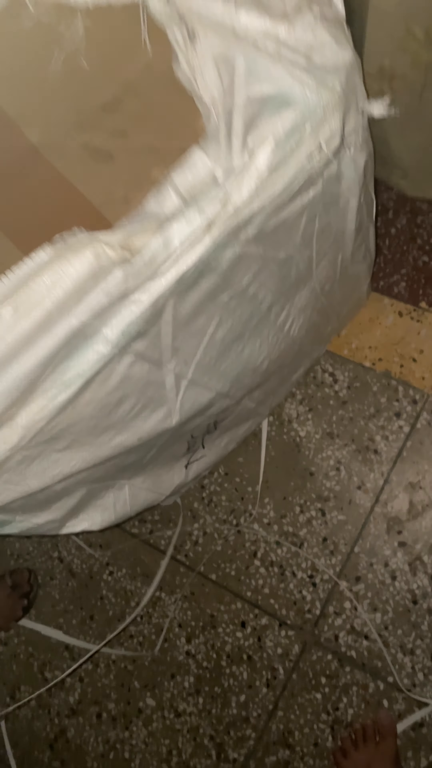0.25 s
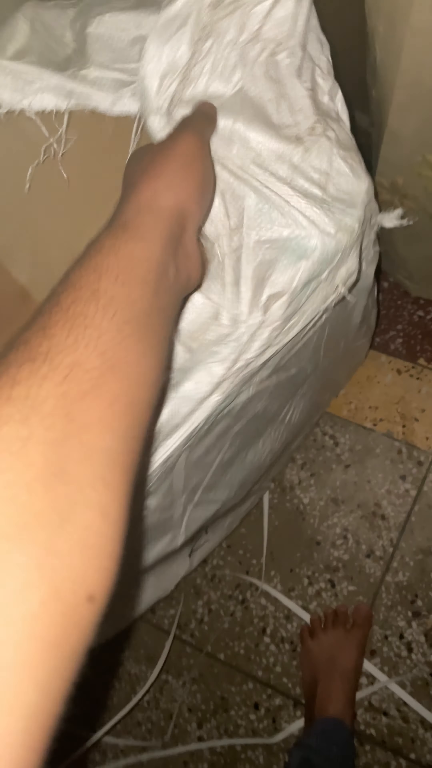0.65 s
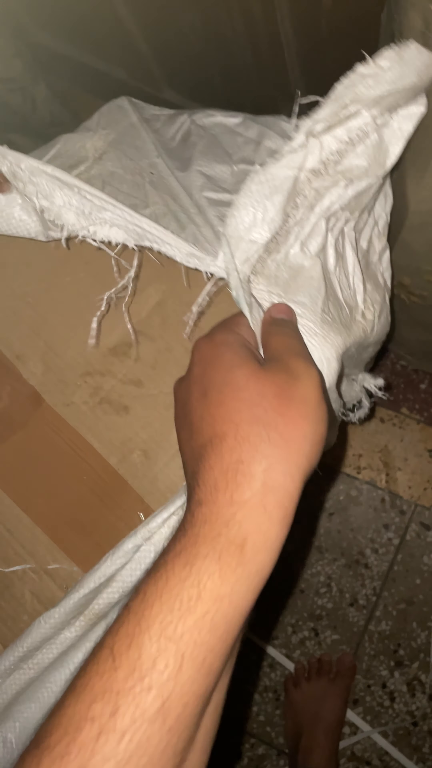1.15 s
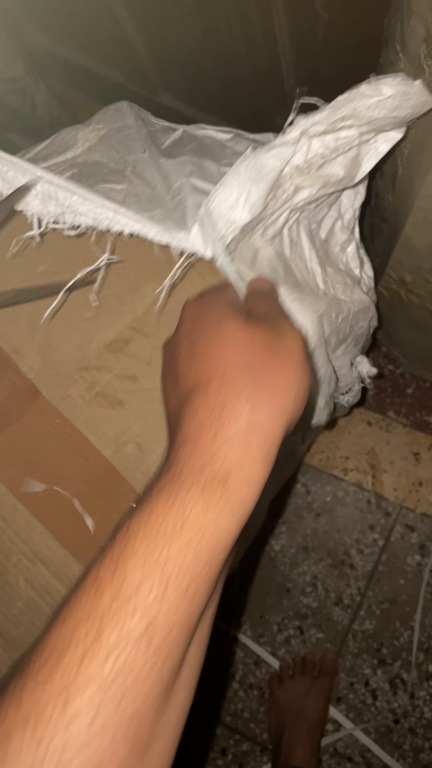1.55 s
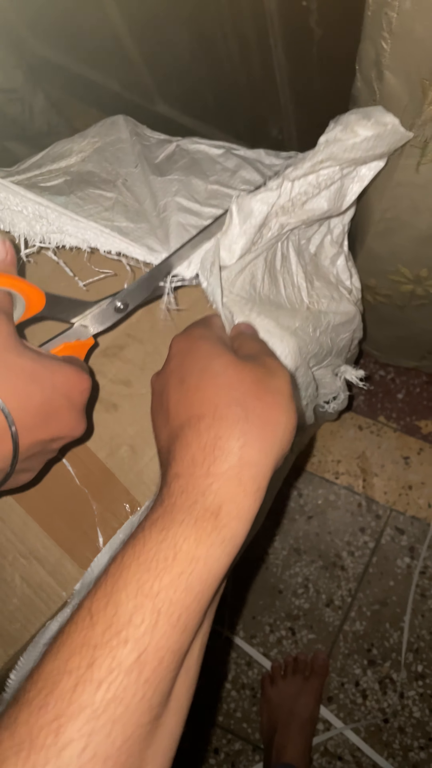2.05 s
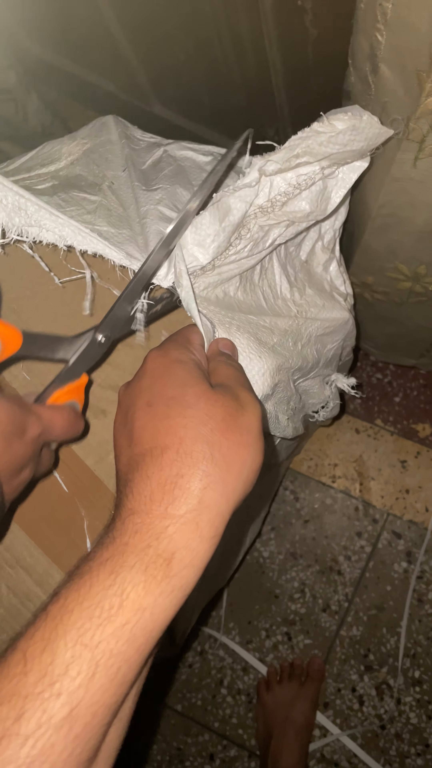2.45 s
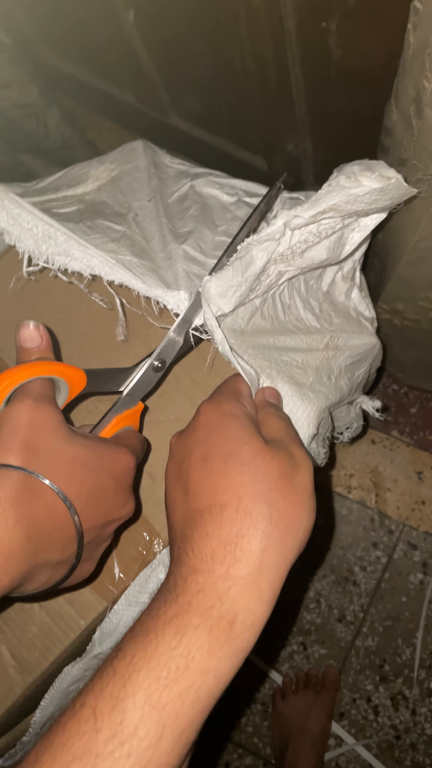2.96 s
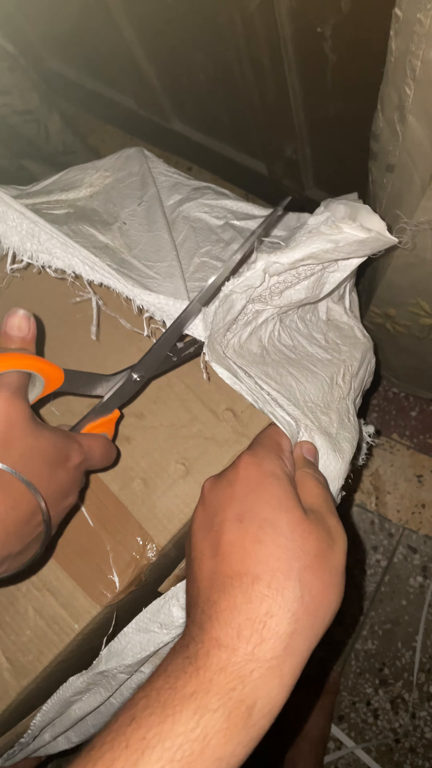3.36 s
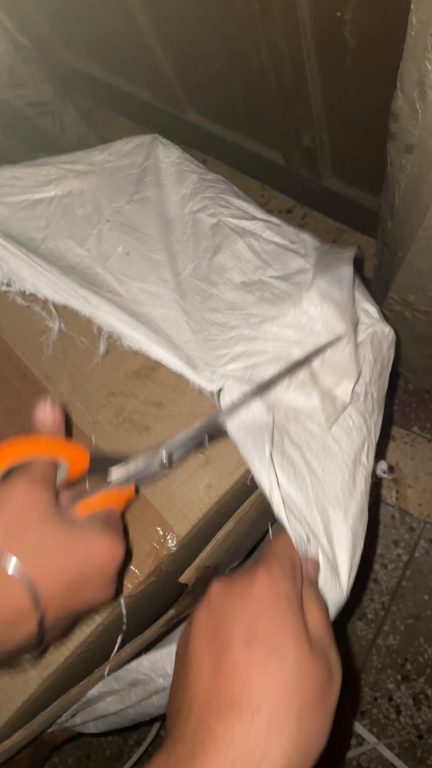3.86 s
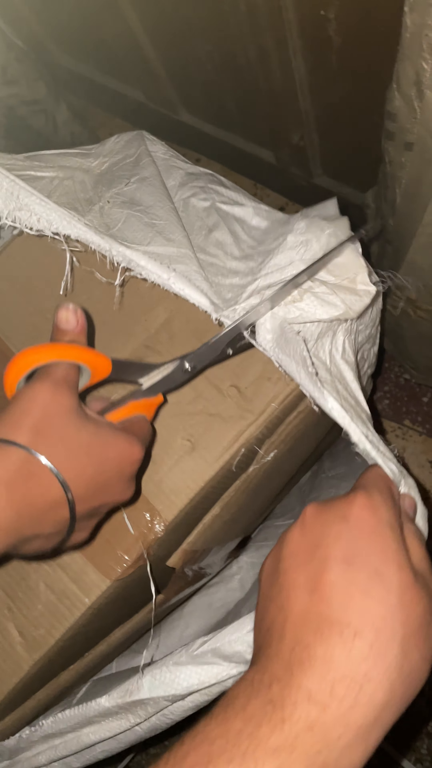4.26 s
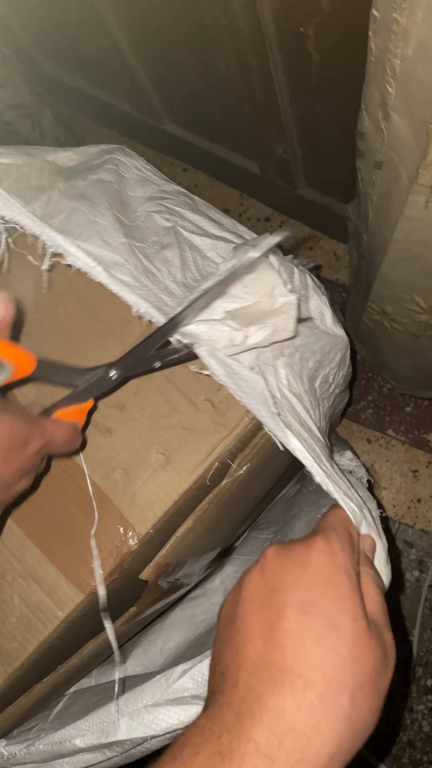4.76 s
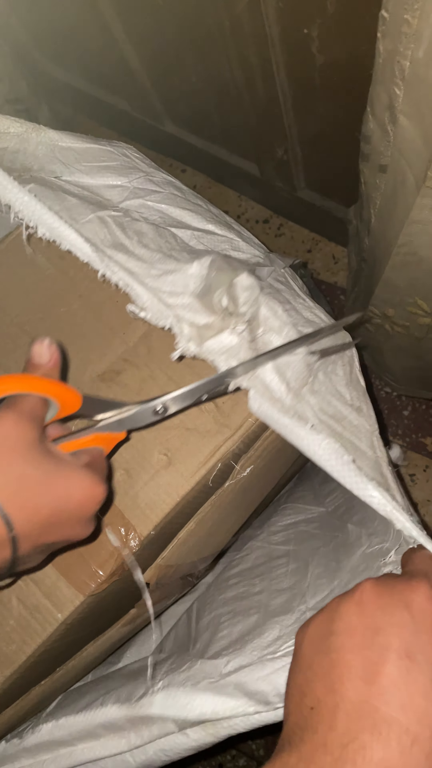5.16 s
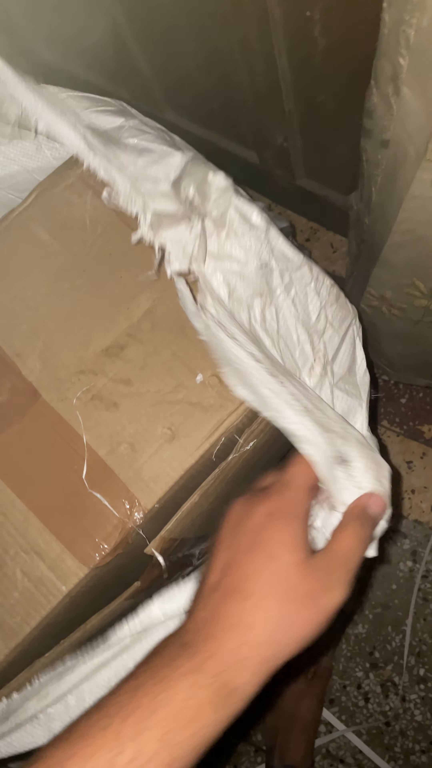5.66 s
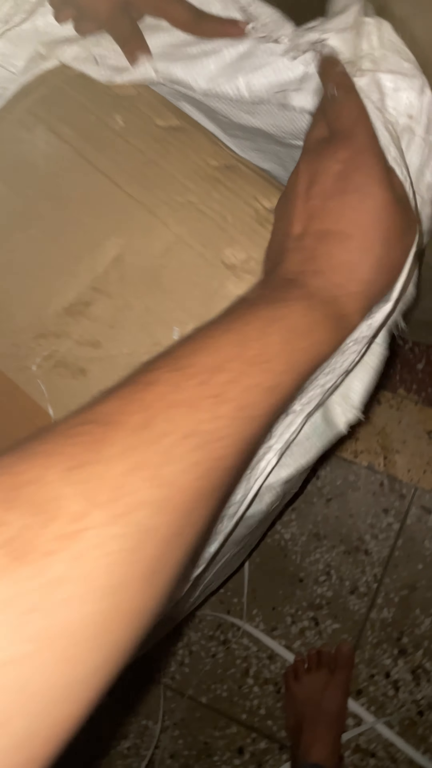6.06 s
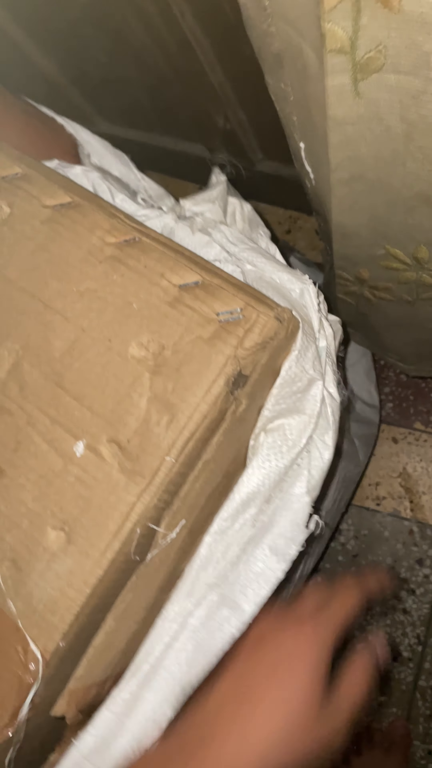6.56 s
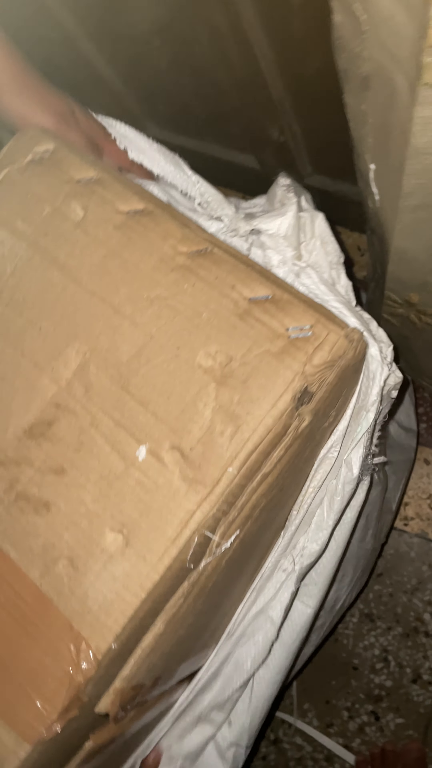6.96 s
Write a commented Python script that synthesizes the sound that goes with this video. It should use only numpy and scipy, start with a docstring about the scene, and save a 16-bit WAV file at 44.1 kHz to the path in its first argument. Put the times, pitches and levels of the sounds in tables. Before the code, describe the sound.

Fine plastic rustling comes first, with one whip-like double slap and a soft boom from a cardboard box. Near-silent holding follows, with faint blade rasps, before loud crunching scissor bites with short twangs and hollow knocks, spaced by small crinkles. A last snip drops in pitch, then sacking is pulled away in surging rustles, pats and thuds. Heard very close, with short hard-room reflections.

```python
"""Scissors, strap and sacking

In a small hard room, close to two microphone ports, scissors bite through a taut plastic strap and woven
sacking round a cardboard box. Each bite is a volley of noise bursts, plucked strap notes and box resonances.
Around the bites a hand tugs the sack, then drags it down off the box: crackling, coloured noise shaped by
the hand's effort. Reflections and quiet room air surround it all."""
import sys
import numpy as np
from scipy import signal
from scipy.fft import rfft, irfft, next_fast_len
from scipy.io import wavfile
from scipy.ndimage import uniform_filter1d

SR = 44100
rng = np.random.default_rng(int(sys.argv[2]) if len(sys.argv) > 2 else 0)


def output_pcm(signal):
    """Save a mono or channel-first signal as 16-bit PCM at the path in sys.argv[1].

    Samples are clipped to [-1, 1] before scaling.
    """
    pcm = np.clip(np.atleast_2d(signal).T, -1, 1) * 32767
    wavfile.write(sys.argv[1], SR, np.round(pcm).astype(np.int16))


N = 348831
TIME = np.arange(N) / SR
# Table levels are relative: the gains of each layer, the room and the ports come after them.

# strands parting under the blades: start_s, crack_db, crack_t60_s, twang_db, strap_note_hz, strap_note_db
SNAPS = [(2.5097, -29, 0.025, -38, 910, -44), (2.848, -6.5, 0.02, -34, 740, -33),
         (2.852, -15, 0.029, -32, 1500, -31), (2.8609, 2.5, 0.012, -8, 780, -21),
         (3.056, -8, 0.021, -10.5, 1640, -13), (3.0594, -4, 0.018, -8.5, 1270, -18),
         (3.0874, 1, 0.0093, -5, 930, -10), (3.1082, -1, 0.029, -26, 657, -24),
         (3.1132, -16, 0.014, -25, 950, -20), (3.1176, -8, 0.024, -22, 1150, -29),
         (3.7359, 0.5, 0.026, -31, 1530, -8), (3.7391, -5, .028, -20, 1560, -11),
         (3.765, -2.5, 0.027, -36, 666, -5), (3.804, 0.5, 0.012, -38, 780, -10),
         (3.817, -3.5, 0.02, -41, 900, -29), (3.82, -8.5, .018, -41, 1110, -18),
         (3.8336, -2, 0.015, -35, 1000, -7), (3.867, -8, 0.027, -27, 1010, -17),
         (3.879, -3, 0.016, -15.5, 1210, -11), (4.0226, -16.5, 0.015, -24.5, 900, -16.5),
         (4.3078, -4.5, 0.017, -26, 1390, -33), (4.313, -5.5, 0.039, -18.5, 705, -17),
         (4.6414, -17, 0.023, -41, 1340, -43), (4.652, -20.5, 0.042, -37.5, 1080, -46),
         (4.8846, -14.5, 0.022, -34, 1520, -15.5), (4.9156, -18.5, 0.014, -23.5, 1050, -30),
         (5.0411, -3, 0.011, -22, 2500, -22), (5.0438, 2, 0.017, -38, 1440, -23),
         (5.049, -6, 0.031, -16.5, 870, -23), (5.0698, -19, 0.025, -22, 1090, -23),
         (5.081, -3.5, 0.013, -28, 1580, -23)]
# blades closing on the strap: start_s, length_s, crunch_db, recoil_on_cardboard_db,
# panel_note_hz, panel_note_db, stretched_strap_hz, stretched_strap_db
BITES = [(2.849, 0.027, -26.5, -23, 517, -23, 1510, -21), (3.049, 0.058, -43, -20.5, 655, -19, 1620, -20),
         (3.737, 0.18, -36, -23, 518, -17, 1560, -17), (4.305, 0.019, -16.5, -38.5, 400, -21, 1380, -21),
         (4.642, 0.016, -39, -31, 406, -49, 1350, -46), (4.871, 0.082, -36, -25, 510, -23.5, 1470, -33),
         (5.042, 0.062, -23, -26, 413, -29, 1500, -31)]
# steel damped by hand and cloth: pitch_hz, width_hz, level_db
BLADE_MODES = [(2542, 45, -4), (2709, 60, -9), (3311, 25, -3), (4835, 22, -2), (5124, 25, 0), (5399, 60, 0),
               (6410, 60, -4), (8500, 150, -5)]
# cardboard panels ringing: pitch_hz, width_hz, level_db
PANEL_MODES = [(518, 30, -2), (640, 30, 0), (767, 38, -6), (938, 28, -3), (1065, 48, -6), (1310, 60, -4),
               (1573, 50, 0), (2285, 40, -4)]
# colours of crack, twang and knock: frequency_hz, level_db (per Hz)
CRACK_COLOUR = [(300, -19), (1000, -3.5), (2000, -1), (2700, 4.5), (4000, 1.5), (5300, 1), (8000, -0.5),
                (11000, -8.5), (13500, -12), (15500, -4.5)]
TWANG_COLOUR = [(500, -12.5), (1100, -8), (1550, 1), (1950, -7.5), (2600, 4.5), (3400, -21), (6000, -21)]
KNOCK_COLOUR = [(60, -26.5), (130, 3.5), (250, -6), (450, -5), (650, -3), (1150, -6), (1550, -16),
                (1950, -10), (2600, -7.5), (4000, -10), (9000, -53)]
KNOCK_T60_S = 0.045


def scissors():
    """Each strand frays, then cracks against the blades; the strap twangs and its recoil knocks the cardboard."""
    cracks, twangs, blows = np.zeros((3, 2, N))
    for s, crack_db, t60, twang_db, *_ in SNAPS:
        fraying = burst(t60=0.025, rise=0.0003, grain_db=2.0, size=600)[:, ::-1]  # reversed: it swells
        add(cracks, s - fraying.shape[1] / SR, gain_of(crack_db - 22.0) * fraying)
        add(cracks, s, gain_of(crack_db) * burst(t60, rise=0.00025, grain_db=0.5))
        add(twangs, s, gain_of(twang_db) * burst(t60, rise=0.0007, grain_db=2.5))
    for s, db in knocks():
        add(blows, s, gain_of(db) * burst(KNOCK_T60_S, rise=0.0018, grain_db=-1.0))
    # thin tapes part too fast to be told apart: a continuous crunch
    crunch = crackle(per_s=700, spread_db=3.5, clump_db=2.5, clump_hz=300, rub=0.3)
    for start, length, db, *_ in BITES:
        add(cracks, start, gain_of(db + 3.5) * faded_piece(crunch, start, length))
    steel = ringing(cracks, BLADE_MODES, ring_db=-20.0)
    cardboard = ringing(blows, PANEL_MODES, ring_db=-19.0)
    strap = gain_of(-5.5) * colour(steel, CRACK_COLOUR) + gain_of(6.5) * colour(twangs, TWANG_COLOUR)
    knock = gain_of(5.0) * colour(cardboard, KNOCK_COLOUR)
    return room(strap, wet_db=-13.3) + room(knock, wet_db=-10.5)


FULL_SNAP_DB = -8
KNOCK_FOLLOWS = 0.46  # dB of knock per dB of crack, relative to a full snap


def knocks():
    """Each snap recoils on the cardboard, harder where the strap lies firmly on it: rows of (s, dB)."""
    rows = []
    for s, crack_db, *_ in SNAPS:
        recoil_db = bite_at(s)[3]
        rows.append((s, recoil_db + KNOCK_FOLLOWS * (crack_db - FULL_SNAP_DB)))
    return rows


def bite_at(s):
    """The bite whose middle lies nearest to a snap."""
    return min(BITES, key=lambda bite: abs(s - bite[0] - bite[1] / 2))


NOTE_LAG_S, NOTE_RISE_S, STRAP_T60_S = 0.00126, 0.00033, 0.014  # the note follows the crack
SPAN_LAG_S, SPAN_T60_S = 0.00307, 0.062  # the stretched strap, pitched by where it is held
RELEASE_S, RELEASE_DB, RELEASE_T60_S = 5.084, -19, 0.052  # the last strand goes
RELEASE_HZ, SLACK_HZ, SLACKEN_S = 2070, 300, 0.00295  # pitch falls as the tension goes


def strap_note():
    """Snaps pluck short, hollow notes from the strap; each bite rings the span, and the parting drops in pitch."""
    notes = np.zeros((2, N))
    t = np.arange(SR // 6) / SR
    rise = 1 - np.exp(-t / NOTE_RISE_S)
    for s, *_, hz, db in SNAPS:
        tone = np.sin(2 * np.pi * (hz * t + rng.random()))
        add(notes, s + NOTE_LAG_S, direct(gain_of(db) * rise * decay(t, STRAP_T60_S) * tone))
    for s, *_, hz, db in BITES:
        add(notes, s + SPAN_LAG_S, boom([(hz, db)], SPAN_T60_S))
    falling_hz = SLACK_HZ + (RELEASE_HZ - SLACK_HZ) * np.exp(-t / SLACKEN_S)
    falling_tone = np.sin(2 * np.pi * np.cumsum(falling_hz) / SR)
    add(notes, RELEASE_S, direct(gain_of(RELEASE_DB) * rise * decay(t, RELEASE_T60_S) * falling_tone))
    return room(notes, wet_db=-10.5)


# blades sliding open or shut: start_s, length_s, level_db
SLIDES = [(2.182, 0.091, -55), (2.462, 0.1, -53), (2.617, 0.14, -54), (3.28, 0.17, -61), (4.646, 0.04, -53),
          (4.93, 0.065, -59), (5.16, 0.055, -49)]
# colour of the rasp: frequency_hz, level_db (per Hz)
RASP_COLOUR = [(500, -13), (1500, -11), (2700, 8), (4000, -19), (5300, 1.5), (7000, 0), (10000, -4),
               (15500, -5)]


def blades():
    """The blades slide over each other: gritty friction noise excites the steel's resonances."""
    rasps = np.zeros((2, N))
    grit = crackle(per_s=700, spread_db=2.5, clump_db=2.0, clump_hz=90, rub=0.6)
    for start, length, db in SLIDES:
        add(rasps, start, gain_of(db) * faded_piece(grit, start, length))
    return room(colour(ringing(rasps, BLADE_MODES, ring_db=-6.0), RASP_COLOUR), wet_db=-10.0)


# tugs that keep the sack taut: start_s (full strength reached), length_s, effort_db, pressure_on_cardboard_db
TUGS = [(0.0, 0.02, -39.5, -4.5), (0.227, 0.15, -44, -1.5), (0.53, 0.11, -43, 0.5),
        (0.702, 0.075, -38.5, 1.5), (0.86, 0.25, -42, -2.5), (0.936, 0.02, -37, 0),
        (1.086, 0.019, -38, -0.5), (1.2, 0.17, -43, -1.5), (1.27, 0.027, -43.5, 1), (1.445, 0.16, -41.5, 1),
        (1.747, 0.17, -41, -3.5), (2.043, 0.078, -39.5, -8), (2.25, 0.28, -54, 1), (2.643, 0.1, -52.5, -7),
        (3.296, 0.043, -53, 5.5), (3.465, 0.16, -45.5, -0.5), (3.684, 0.032, -40.5, 2.5),
        (4.024, 0.14, -41, -2.5), (4.19, 0.18, -44.5, -2.5), (4.5, 0.21, -55.5, 2.5),
        (5.088, 0.1, -50.5, 6), (5.335, 0.012, -39.5, -4),]
# moments when the hand keeps quite still: start_s, end_s, effort_change_db
STILLS = [(2.565, 2.625, -4), (2.765, 2.95, -14), (4.775, 4.87, -6)]
# the sack dragged off in one long pull: time_s, rustle_db, scrape_db, box_rumble_db
DRAG = [(5.481, -53.5, -64, -58), (5.62, -51.5, -47, -54), (5.69, -41, -40.5, -47.5),
        (5.85, -52.5, -50.5, -46), (5.92, -44, -41.5, -44.5), (6.08, -43.5, -45, -39.5),
        (6.13, -46, -43, -48), (6.225, -33, -39, -34.5), (6.32, -38.5, -45, -41), (6.39, -41.5, -40, -46),
        (6.45, -42, -49, -38), (6.52, -46, -47, -46), (6.58, -42, -42, -42), (6.66, -45.5, -50.5, -37.5),
        (6.76, -38.5, -44, -37), (6.79, -36, -42, -27.5), (6.835, -30.5, -36.5, -34.5),
        (6.92, -33, -37.5, -32.5), (7.0, -32, -35.5, -35), (7.12, -32, -35, -35), (7.25, -35.5, -39.5, -41),
        (7.31, -46.5, -49, -44.5), (7.46, -38.5, -42.5, -44.5), (7.65, -42, -48, -37),
        (7.71, -37, -38, -47), (7.77, -31.5, -36, -35), (7.91, -35, -37.5, -40)]
TUG_ATTACK_S, TUG_T60_S, TUG_SAG_DB_PER_S = 0.056, 0.36, 0.5
HELD_DB = -54.5  # effort of merely holding the sack
RUMBLE_DB, RUMBLE_FOLLOWS = -13, 0.82  # the box shifts with each tug: dB at full effort, dB per dB of effort


def effort():
    """Tugs swell, sag and let go, then the long drag: strengths of pull, slide, scrape and box shift."""
    pull, scrape = np.zeros((2, N))
    for start, length, db, pressure_db in TUGS:
        t = TIME - start
        sag_db = TUG_SAG_DB_PER_S * np.clip(t, 0, length)
        release_db = 60 * np.maximum(t - length, 0) / TUG_T60_S
        tug = np.clip(1 + t / TUG_ATTACK_S, 0, 1) * gain_of(db - sag_db - release_db)
        pull = np.hypot(pull, tug)
        scrape = np.hypot(scrape, tug * gain_of(pressure_db))
    still_db = np.zeros(N)
    for start, end, db in STILLS:
        still_db += db * ((TIME > start) & (TIME < end))
    moving = gain_of(uniform_filter1d(still_db, size=900))  # eased over about 20 ms
    shift = gain_of(RUMBLE_DB) * np.hypot(pull, scrape) ** RUMBLE_FOLLOWS
    s, *columns = np.transpose(DRAG)
    slide, dragged, shaken = [gain_of(np.interp(TIME, s, db)) * (TIME > s[0]) for db in columns]
    held_pull = moving * np.hypot(pull, gain_of(HELD_DB))
    return held_pull, slide, np.hypot(moving * scrape, dragged), np.hypot(moving * shift, shaken)


# colours of rustle, scrape and bunched cloth bumping over cardboard: frequency_hz, level_db (per Hz)
RUSTLE_COLOUR = [(300, -41), (1100, -5.5), (1800, -2.5), (2700, -0.5), (3600, -4.5), (5000, -8),
                 (6800, -10.5), (9000, -14.5), (12000, -21.5), (15500, -23.5)]
SCRAPE_COLOUR = [(80, -10.5), (230, -1.5), (400, 4), (560, 1), (800, 3), (1400, -5.5), (2200, -15.5),
                 (5000, -19)]
LUMPS_COLOUR = [(100, -32.5), (190, -2.5), (260, -0.5), (370, -0.5), (520, -12.5), (1500, -42)]
LUMPS_DB = -10


def sacking(pull, slide, drag):
    """Tugged tapes rustle in fine crinkles; sliding ones swish densely; the sack scrapes dully on the box."""
    slips = crackle(per_s=1400, spread_db=2.7, clump_db=1.2, clump_hz=130, rub=0.55)
    crinkles = folding(colour(slips, RUSTLE_COLOUR), depth_db=3.0, order=4, count=3, size=256)
    rustle = folding(crinkles, depth_db=1.3, order=9, count=12, size=512)
    weave = crackle(per_s=2000, spread_db=2.7, clump_db=1.1, clump_hz=150, rub=0.55)
    swish = folding(colour(weave, RUSTLE_COLOUR), depth_db=2.6, order=4, count=3, size=256)
    friction = crackle(per_s=900, spread_db=2.0, clump_db=1.0, clump_hz=70, rub=0.7)
    scrape = colour(friction, SCRAPE_COLOUR)
    bumping = crackle(per_s=60, spread_db=2.0, clump_db=3.0, clump_hz=35, rub=0.6)
    lumps = colour(bumping, LUMPS_COLOUR)
    cloth = gain_of(3.0) * pull * rustle + gain_of(3.0) * slide * swish
    contact = drag * (gain_of(-0.5) * scrape + gain_of(LUMPS_DB) * lumps)
    return room(cloth + contact, wet_db=-7.5)


# stiff folds of the sack buckling: start_s, bright_pop_db, dull_crumple_db
CREASES = [(0.0239, -21, -46), (0.262, -24.5, -28), (0.8863, -20, -40), (0.9382, -17.5, -23),
           (1.099, -28, -23.5), (1.4477, -24, -23.5), (2.242, -24, -39), (2.257, -25.5, -60),
           (2.316, -35, -32.5), (2.337, -24, -43), (2.354, -31, -41), (2.896, -18.5, -29),
           (3.186, -25.5, -47), (3.2858, -22.5, -51), (3.442, -23.5, -42), (4.109, -19, -30),
           (4.132, -17.5, -30), (4.327, -13, -26), (4.4127, -25, -53), (4.4393, -28, -46),
           (5.111, -18, -28), (5.169, -20.5, -52), (5.194, -16, -47), (5.2005, -16.5, -47),
           (5.6512, -23, -36), (6.2215, -21, -22), (6.2316, -21, -22), (6.261, -13, -33),
           (6.4353, -23, -24.5), (6.4655, -15.5, -32), (6.4922, -15, -30), (7.6663, -14, -33),
           (6.835, -27, -29), (7.7545, -24, -33), (7.785, -24, -30), (7.862, -28, -22.5)]
# colour of the crumple: frequency_hz, level_db (per Hz)
CRUMPLE_COLOUR = [(100, -6), (400, -1.5), (900, -1), (2000, -1), (3000, -7), (6000, -33), (12000, -23)]
SMALL_CREASES_PER_S, SMALL_CREASE_DB, SMALL_CREASE_SPREAD_DB = 14, -4, 2.5
SMALL_CREASE_FOLLOWS = 0.6  # dB of tick per dB of effort


def creases(pull):
    """Stiff folds pop over one at a time; lesser ones tick at random, louder with the effort on the sack."""
    pops, crumples = np.zeros((2, 2, N))
    for s, pop_db, crumple_db in CREASES:
        add(pops, s, gain_of(pop_db) * burst(t60=0.016, rise=0.0003, grain_db=1.0))
        add(crumples, s, gain_of(crumple_db) * burst(t60=0.028, rise=0.0006, grain_db=2.0))
    happens = rng.random(N) < SMALL_CREASES_PER_S / SR
    strength = gain_of(SMALL_CREASE_SPREAD_DB * np.clip(rng.standard_normal(N), -2, 2))
    folds = happens * strength * pull ** SMALL_CREASE_FOLLOWS
    ticks = convolve(np.tile(folds, (2, 1)), burst(t60=0.008, rise=0.0002, grain_db=1.0))
    pops += gain_of(SMALL_CREASE_DB) * ticks
    bright = gain_of(-4.0) * colour(pops, CRACK_COLOUR)
    dull = gain_of(1.0) * colour(crumples, CRUMPLE_COLOUR)
    return room(bright + dull, wet_db=-9.0)


# colour of the whipped flap: frequency_hz, level_db (per Hz)
FLICK_COLOUR = [(200, -32), (1050, -29), (1450, -17), (1950, -1), (2400, 1), (3100, -1), (3600, -6),
                (4100, -3), (4600, -9), (5400, -6), (7000, -17), (9400, -16), (15000, -33)]
FLICK_S, FLICK_DB, FLICK_T60_S = 0.5086, -1, 0.01
REBOUND_S, REBOUND_DB = 0.0038, -14  # second slap, this long after the first
FLUTTER_DB, FLUTTER_T60_S = -30.5, 0.19  # crackling tail


def flap():
    """A loose flap of sacking swishes up to speed, is checked with a dry double slap and flutters to rest."""
    slap, flutter = np.zeros((2, 2, N))
    swish = burst(t60=0.03, rise=0.0003, grain_db=2.0, size=600)[:, ::-1]  # reversed: it swells
    add(slap, FLICK_S - swish.shape[1] / SR, gain_of(FLICK_DB - 20.0) * swish)
    add(slap, FLICK_S, gain_of(FLICK_DB) * burst(FLICK_T60_S, rise=0.0007, grain_db=0.0))
    second_s = FLICK_S + REBOUND_S
    add(slap, second_s, gain_of(REBOUND_DB) * burst(t60=0.011, rise=0.0003, grain_db=0.0))
    add(flutter, second_s, gain_of(FLUTTER_DB) * burst(FLUTTER_T60_S, rise=0.002, grain_db=2.5))
    narrow_flutter = colour(flutter, FLICK_COLOUR)  # coloured twice in all, so its band is narrower
    return room(colour(slap + narrow_flutter, FLICK_COLOUR), wet_db=-16.0)


# hands and bunched cloth patting the cardboard: start_s, level_db, t60_s, panel_note_hz
PATS = [(0.569, -24.5, 0.044, 630), (2.317, -35.5, 0.078, 326), (4.396, -37, 0.068, 360),
        (5.821, -28, 0.045, 328), (5.962, -35.5, 0.2, 395), (6.23, -29, 0.11, 350), (6.285, -35, .1, 415),
        (7.1, -29, 0.17, 427), (7.466, -30, 0.064, 352), (7.545, -34, .12, 374), (7.648, -31, 0.066, 368),
        (7.857, -25, .1, 422)]
# colour of the dull contact: frequency_hz, level_db (per Hz)
THUD_COLOUR = [(60, -16), (200, -3.5), (400, 1.5), (600, -10), (1200, -14.5), (3000, -30), (8000, -55)]
PAT_THUD_DB, PAT_NOTE_DB = -3, 2


def pats():
    """A soft contact gives a dull thud and the short note of the panel it lands on."""
    thuds, notes = np.zeros((2, 2, N))
    for s, db, t60, hz in PATS:
        add(thuds, s, gain_of(db + PAT_THUD_DB) * burst(t60, rise=0.002, grain_db=1.0))
        add(notes, s, boom([(hz, db + PAT_NOTE_DB)], t60))
    return room(colour(thuds, THUD_COLOUR) + notes, wet_db=-8.0)


# box bumped by a hand or let go by the strap: start_s, boom_db, t60_s, struck_panel_hz
BUMPS = [(0.575, -19, 0.2, 110), (0.612, -26, 0.15, 133.4), (0.653, -23.5, 0.075, 94),
         (2.32, -34.5, 0.11, 157), (2.513, -27, 0.037, 308), (3.129, -29, 0.059, 175),
         (4.326, -39, 0.08, 114), (3.894, -30, 0.082, 138), (4.073, -29, 0.048, 88.5),
         (5.101, -25, 0.059, 88), (6.452, -28, 0.031, 99), (6.77, -33.5, 0.14, 194),
         (7.205, -30.5, 0.17, 75), (7.65, -36, 0.045, 110), (7.86, -31, 0.11, 272)]
# the whole box and the air inside it: pitch_hz, level_db
BOX_MODES = [(71, -0.5), (99, -3.5), (124, 0.5), (150, -39), (198, -3), (265, -12), (371, -14)]
# colour of the shifting box: frequency_hz, level_db (per Hz)
RUMBLE_COLOUR = [(20, -49), (40, -10), (65, 0.5), (130, 3), (200, 2), (320, -19.5), (800, -30)]
PANEL_DB = 6.5  # the struck panel's note beside the boom
RECOIL_DB, RECOIL_LAG_S, RECOIL_T60_S = -7, 0.00893, 0.13  # the whole box answers every knock
PANEL_LAG_S, PANEL_NOTE_T60_S = 0.00796, 0.15


def box(shift):
    """The hollow box booms in its air and panel modes when bumped or knocked, and rumbles as it shifts."""
    booms = np.zeros((2, N))
    for s, db, t60, panel_hz in BUMPS:
        add(booms, s, gain_of(db) * boom(BOX_MODES + [(panel_hz, PANEL_DB)], t60))
    for s, db in knocks():
        add(booms, s + RECOIL_LAG_S, gain_of(db + RECOIL_DB) * boom(BOX_MODES, RECOIL_T60_S))
    for s, _, _, _, panel_hz, panel_db, *_ in BITES:
        add(booms, s + PANEL_LAG_S, boom([(panel_hz, panel_db)], PANEL_NOTE_T60_S))
    grinding = crackle(per_s=150, spread_db=-1.5, clump_db=1.5, clump_hz=23.95, rub=1.0)
    rumble = colour(grinding, RUMBLE_COLOUR)
    return room(gain_of(-2.5) * booms, wet_db=-11.0) + shift * rumble


# colour of the quiet room: frequency_hz, level_db (per Hz)
AIR_COLOUR = [(30, 4.5), (60, 6), (130, -14), (300, -6.5), (1000, -12.5), (3000, -27), (6000, -33),
              (10000, -41), (15500, -45)]


def air():
    """The quiet air of the room: steady coloured noise on both paths."""
    return gain_of(-46.5) * colour(rng.standard_normal((2, N)), AIR_COLOUR)


# how long the small hard room rings: frequency_hz, t60_s
ROOM_DECAY = [(100, 0.33), (260, 0.38), (700, 0.26), (1840, 0.24), (4850, 0.25), (15000, 0.13)]


def room(x, wet_db, start=0.0036):
    """Adds sparse reflections after a start in seconds, each band dying at its own speed."""
    length = SR // 2
    signs = rng.choice([-1.0, 1.0], (2, length))
    taps = signs * (rng.random((2, length)) < 0.08) * (TIME[:length] > start)
    hz, t, z = signal.stft(taps, SR, nperseg=256)
    tail = signal.istft(z * decay(t, read(ROOM_DECAY, hz)[:, None]), SR, nperseg=256)[1]
    return x + gain_of(wet_db) * convolve(x, tail / np.linalg.norm(tail[0]))


# stereo likeness of the two channels: frequency_hz, likeness (0-1)
LIKENESS = [(120, .985), (250, .9), (600, .6), (1100, .35), (2700, .5), (4300, .25), (5300, .84),
            (7500, .96), (9500, .86), (14000, .96)]
# phase by which the left channel leads: frequency_hz, lead_radians
LEAD = [(0, 0), (230, 0), (600, 1.5), (1300, .5), (2700, 3.2), (4200, 5), (5100, 6.3), (6200, 7.7),
        (7500, 9.4), (9000, 10.8), (11200, 12.6), (14200, 15.7), (16000, 16.9)]
# left channel's level minus right's: frequency_hz, difference_db
BALANCE = [(60, -.8), (200, -2.3), (380, -3.5), (650, 5.5), (1300, 5), (2400, 1), (4500, -1), (8000, -.4),
           (15000, 0)]


def ports(x):
    """Two paths become left and right, which share part of their sound, by frequency; left leads in phase."""
    size = next_fast_len(N + 4096)
    hz = np.fft.rfftfreq(size, 1 / SR)
    shared, apart = rfft(x, size)
    likeness = np.clip(read(LIKENESS, hz), 0, 1)
    tilt = gain_of(read(BALANCE, hz) / 2)
    shared = shared * np.sqrt((1 + likeness) / 2)
    apart = apart * np.sqrt((1 - likeness) / 2)
    left = (shared + apart) * tilt
    right = (shared - apart) / tilt * np.exp(-1j * read(LEAD, hz))
    return irfft([left, right], size)[:, :N]


def burst(t60, rise, grain_db, size=8000):
    """A quick burst of grainy noise that dies away, its strength jumping in unequal steps, on two unrelated
    paths."""
    t = np.arange(size) / SR
    # strength jumps every 20 samples, about twice a millisecond, each step its own
    strengths = np.repeat(np.clip(rng.standard_normal(size // 20), -2, 2), 20)
    grains = evened(gain_of(grain_db * strengths))
    return rng.standard_normal((2, size)) * grains * (1 - np.exp(-t / rise)) * decay(t, t60)


def crackle(per_s, spread_db, clump_db, clump_hz, rub):
    """Surfaces slip in clumps of clicks of very unequal size, over a steady rub; rms 1."""
    sizes = gain_of(spread_db * np.minimum(rng.exponential(1, N), 4.5))
    clicks = sizes * (rng.random(N) < per_s / SR)
    slips = signal.lfilter([1], [1, -np.exp(-1 / (0.00045 * SR))], clicks ** 2)  # power fades in 0.45 ms
    strength = np.sqrt(slips / slips.mean() + rub ** 2) * gain_of(clump_db * wander(clump_hz))
    return evened(strength * rng.standard_normal((2, N)))


def folding(x, depth_db, order, count, size):
    """As the cloth folds and unfolds, patches of its colour (order bins by count frames) swell and fade."""
    z = signal.stft(x, SR, nperseg=size)[2]
    patches = uniform_filter1d(rng.standard_normal(z.shape[1:]), size=order, axis=0)
    patches = uniform_filter1d(patches, size=count, axis=1)
    return evened(signal.istft(z * gain_of(depth_db * evened(patches)), SR, nperseg=size)[1][:, :N])


def ringing(x, modes, ring_db):
    """An object's damped modes ring along with whatever shakes it."""
    t = np.arange(SR // 6) / SR
    ring = np.zeros(len(t))
    for hz, width, db in modes:
        ring += gain_of(db) * np.sqrt(width) * np.exp(-np.pi * width * t) * np.cos(2 * np.pi * hz * t)
    wet = gain_of(ring_db) * convolve(x, ring / np.linalg.norm(ring))
    return (x + wet) / np.hypot(1, gain_of(ring_db))


def boom(modes, t60):
    """Modes (hz, db), each detuned a few Hz by chance, swell and die together."""
    t = np.arange(SR // 2) / SR
    ring = sum(gain_of(db) * np.sin(2 * np.pi * (hz + rng.uniform(-7, 3)) * t) for hz, db in modes)
    return direct(ring * (1 - np.exp(-t / 0.0023)) * decay(t, t60))


def direct(sound):
    """A pure ring reaches both ports by the shared path alone."""
    return np.array([sound, np.zeros_like(sound)])


def colour(x, spectrum, size=4096):
    """A causal, minimum-phase filter of unit energy with the given spectrum."""
    log_gain = np.log(gain_of(read(spectrum, abs(np.fft.fftfreq(size, 1 / SR)))))
    response = np.fft.ifft(np.exp(np.conj(signal.hilbert(log_gain)))).real[:size // 2]
    return convolve(x, response / np.linalg.norm(response))


def convolve(x, response):
    """Filters both paths."""
    return signal.oaconvolve(x, np.atleast_2d(response), axes=1)[:, :N]


def faded_piece(x, start, length):
    """Cuts a stretch (seconds) out of a texture and softens its ends."""
    piece = x[:, round(start * SR):round((start + length) * SR)]
    return piece * signal.windows.tukey(piece.shape[1], 0.2)


def add(mix, s, sound):
    """Mixes a sound in at time s."""
    part = mix[:, round(s * SR):][:, :sound.shape[-1]]
    part += sound[..., :part.shape[1]]


def wander(rate_hz):
    """Straight lines between random knots at the given rate; rms 1."""
    knots = rng.standard_normal(4096)
    return evened(np.interp(TIME * rate_hz, np.arange(len(knots)), knots))


def gain_of(db):
    """Decibels to amplitude."""
    return 10 ** (np.asarray(db) / 20)


def decay(t, t60):
    """Exponential fall of 60 dB in t60 seconds."""
    return gain_of(-60 * t / t60)


def evened(x):
    """Scales to rms 1."""
    return x / np.sqrt(np.mean(x ** 2) + 1e-20)


def read(points, hz):
    """Reads a table on a log-frequency axis."""
    f, value = np.transpose(points)
    return np.interp(np.log(hz + 1), np.log(f + 1), value)


def scene():
    """Scissors, sack and box over the quiet air of the room, heard at the two ports."""
    background = air()
    pull, slide, drag, shift = effort()
    cloth = creases(np.hypot(pull, slide)) + flap() + sacking(pull, slide, drag)
    cutting = scissors() + strap_note() + blades()
    return ports(cutting + cloth + pats() + box(shift) + background)


LOW_CUT_HZ, EDGE_HZ = 54.6, 16050  # where the microphones' bass gives out; upper band limit


def record(dry):
    """The microphones lose the deepest bass, the loudest cracks are rounded off; then the band limit."""
    low_cut = signal.butter(4, LOW_CUT_HZ, "highpass", fs=SR, output="sos")
    rounded = np.tanh(signal.sosfilt(low_cut, dry))
    band_limit = signal.firwin(301, EDGE_HZ, window=("kaiser", 9), fs=SR)
    return signal.oaconvolve(rounded, band_limit[None], "same")


dry = scene()
out = record(dry)
output_pcm(out)
```